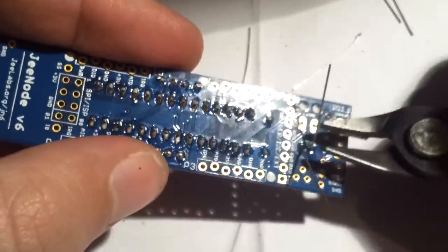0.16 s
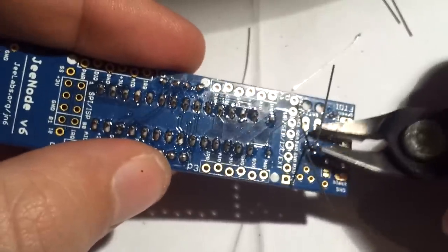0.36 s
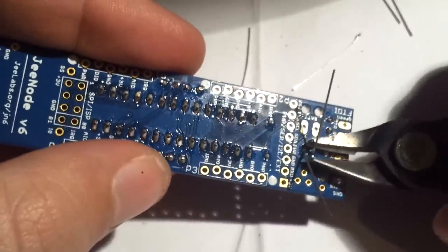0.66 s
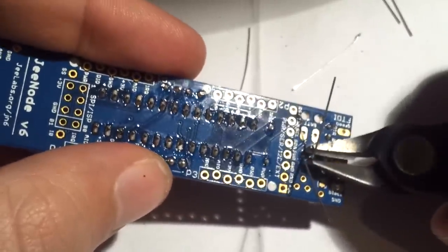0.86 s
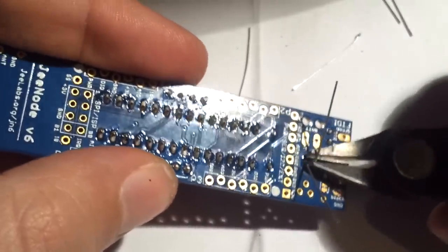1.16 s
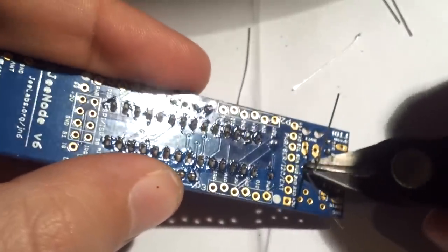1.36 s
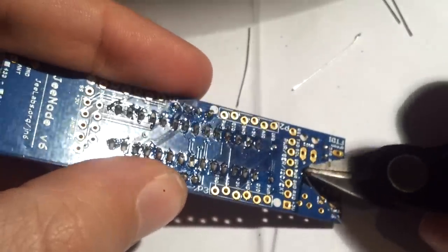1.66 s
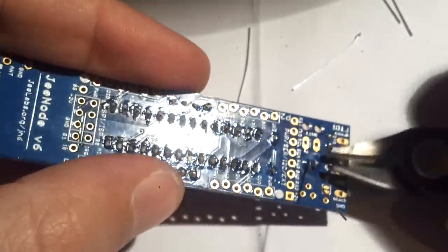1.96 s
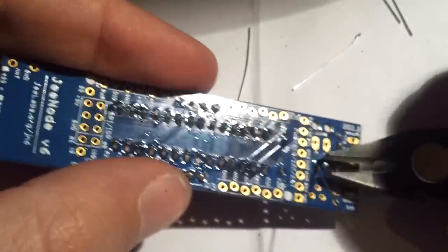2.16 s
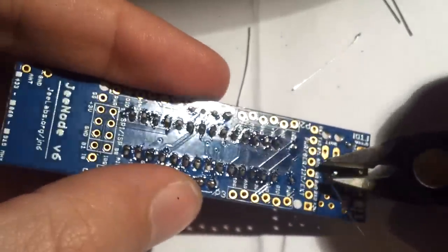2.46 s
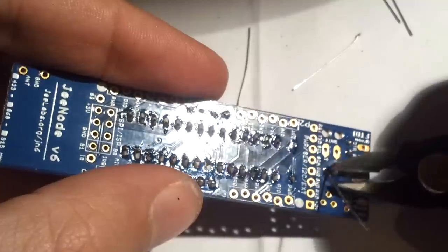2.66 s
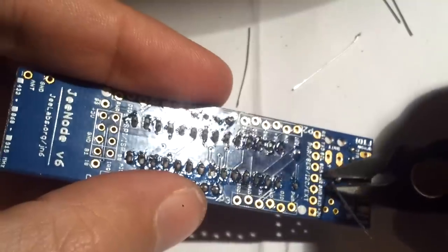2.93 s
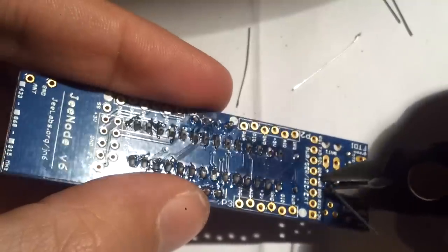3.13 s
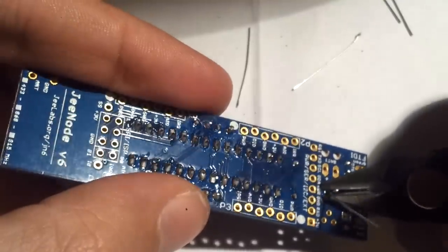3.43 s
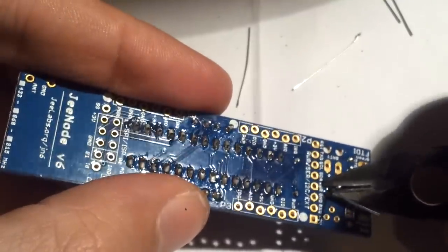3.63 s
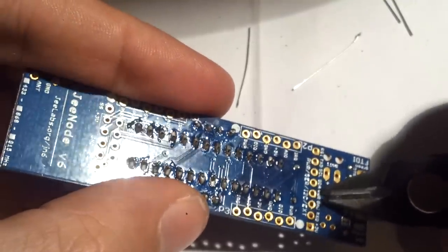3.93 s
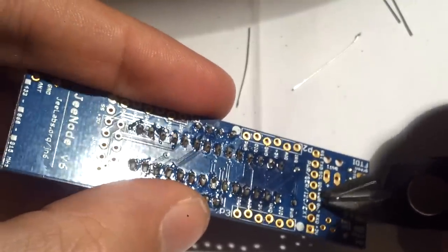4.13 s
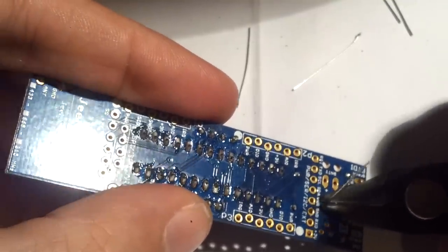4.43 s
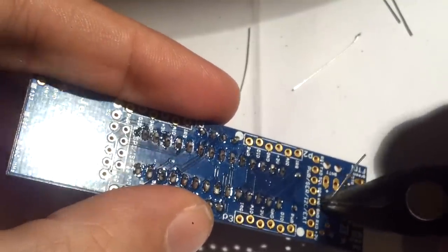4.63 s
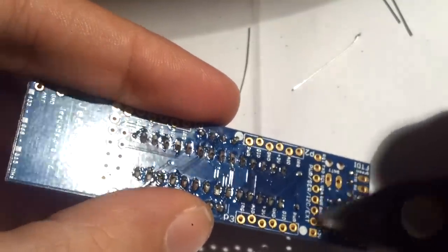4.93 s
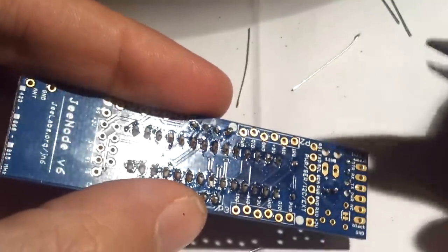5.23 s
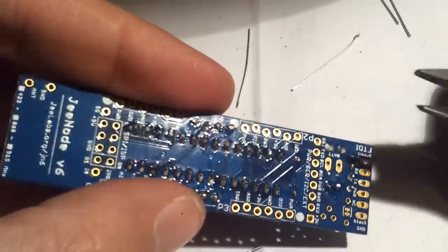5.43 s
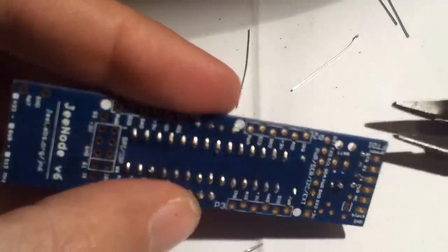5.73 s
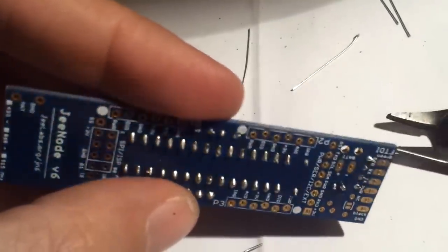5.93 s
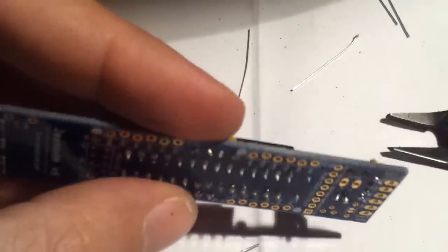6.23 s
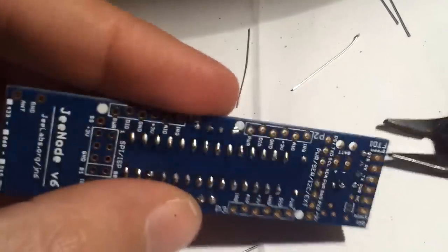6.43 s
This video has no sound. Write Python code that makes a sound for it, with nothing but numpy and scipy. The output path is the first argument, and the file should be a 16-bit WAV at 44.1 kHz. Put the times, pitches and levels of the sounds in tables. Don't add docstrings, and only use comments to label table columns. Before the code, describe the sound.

Close single-microphone sound of wire cutting on a small circuit board. A constant low fan hum with airy rush sits further off. Two very loud, dry, distorted metallic snips stand well apart; the first is followed by thin, bright bounces of the cut lead, the second by a short bright room tail. Then come faint metal ticks, one sharper, and a soft hollow tap.

```python
import sys
import numpy as np
from scipy import signal
from scipy.fft import rfft, irfft, next_fast_len
from scipy.io import wavfile
from scipy.ndimage import uniform_filter1d, map_coordinates

SR = 44100
rng = np.random.default_rng(int(sys.argv[2]) if len(sys.argv) > 2 else 0)


def voltage_ratio(level):
    return 10 ** (np.asarray(level, float) / 20)


def persist_wave(psi):
    counts = np.round(np.clip(psi, -1, 1) * 32767).astype(np.int16)
    wavfile.write(sys.argv[1], SR, np.atleast_2d(counts).T)


N = 290619

# start in seconds, blow in dB, jaw chatter in seconds, room answer in dB,
# pressure push in dB.
SNIPS = [
    (1.584, -1.5, 0.0049, -10, -30),
    (4.7898, -0.5, 0.0052, -4, -29),
]
# pitch in Hz, level in dB, t60 in seconds.
JAW_MODES = [
    [(2990, -10.5, 0.019), (4760, -10.5, 0.022), (5340, -14, 0.018), (5640, -3.5, 0.025),
     (6660, -11, 0.013), (7400, 1.5, 0.029), (8400, -12, 0.022), (10230, -5, 0.016), (11400, -14, 0.021),
     (12000, -30, 0.021)],
    [(3740, -17, 0.024), (4940, -2, 0.025), (5722, -4, 0.036), (6250, -11, 0.021), (7700, 0, 0.029),
     (8300, -19, 0.085), (9700, -7, 0.072), (10200, -18, 0.035), (10270, -8, 0.024), (11540, -10, 0.04)],
]
# frequency in Hz, level in dB.
CRACK_COLOURS = [
    [(590, -54), (1000, -27), (1420, -12), (2330, -27), (2890, -8), (4240, -27), (4600, -12.5), (6670, -3),
     (9970, -2), (11800, -19), (15300, -49), (22000, -120)],
    [(590, -49), (1000, -22), (2280, -9.5), (2830, -13), (3820, -8.5), (4280, -12), (4790, -6.5),
     (6810, -2.5), (7550, 1), (11800, -19), (15300, -48), (22000, -120)],
]
# frequency in Hz, level in dB.
ANSWER_COLOURS = [
    [(2350, -40), (4000, -8), (5490, -8), (6280, -8), (6840, -1), (8120, -1), (11200, -10), (11800, -12),
     (15300, -45), (22000, -120)],
    [(1290, -37), (2200, -5), (2720, -19), (2930, -12), (3720, -4.5), (4560, -9.5), (7250, -3.5),
     (8760, -6), (11800, -12.5), (15300, -41), (22000, -120)],
]
# frequency in Hz, t60 in seconds.
ROOM_DECAY = [(2000, .2), (5000, 0.27), (8000, 0.33), (12000, 0.25)]
ECHO_LUMPS_DB, ECHO_LUMPS_PER_S = 2, 300

# start in seconds, peak in dB, pitch in Hz, t60 in seconds.
BOUNCES = [
    (1.8503, -15, 7540, 0.0056),
    (1.8526, -26, 6560, .004),
    (1.866, -26, 6300, 0.013),
    (1.9599, -12, 7300, 0.0056),
    (1.9708, -32, 9500, 0.0067),
    (1.995, -22, 8000, 0.0039),
]
# start in seconds, peak in dB, pitch in Hz,
# t60 in seconds.
BRUSHES = [(.3955, -31.5, 9700, 0.011), (1.692, -22, 7900, 0.049), (5.535, -16, 9070, 0.0065),
           (5.539, -26, 8000, .006), (5.583, -31, 9300, .005), (5.6235, -27, 5000, .015),
           (5.661, -31, 9200, .03), (5.6616, -30, 5300, .012), (5.667, -25.5, 7100, 0.022),
           (5.88, -39, 10400, .04), (5.9055, -28, 9250, .008), (5.9930, -8.5, 5700, 0.0051),
           (5.9947, -23.5, 6900, 0.032), (6.004, -27, 7500, .01), (6.019, -23, 6900, .005),
           (6.485, -30.5, 8400, 0.014)]
BOUNCE_OVERTONE_DB, BRUSH_OVERTONE_DB = -5.5, -5
OVERTONE_PITCH, OVERTONE_DECAY = 1.53, 1.74
NOISY_AT_PIVOT, NOISY_PER_OCTAVE, PIVOT_HZ = 0.36, 0.33, 7500
RISE_SHARE = 0.022

# start in seconds, level in dB.
KNOCK = (6.4856, -18)
# pitch in Hz, level in dB, t60 in seconds.
BOARD_MODES = [(202, 1, .06), (327, 1, 0.06), (517, -11, 0.045), (910, -0.5, 0.047), (1310, -5, 0.033),
               (1710, -6, .02)]

SHAFT_HZ = 43.282
# multiple of the shaft speed, rms in dB.
FAN_ORDERS = [(1, -65.9), (4, -51.8), (5, -38.9), (10, -41.1), (17, -40.8), (20, -52.4), (25, -55.0),
              (30, -56.0), (35, -56.8), (40, -60.0), (45, -61.9)]
# frequency in Hz, rms in dB.
MAINS = [(100.0, -57.8), (300.0, -40.9), (2354.12, -65.7), (2690.38, -59.0)]
# frequency in Hz, density in dB per Hz.
RUSH_COLOUR = [(20, -84), (45, -75.5), (100, -66.5), (125, -61.5), (250, -58), (300, -57.5), (405, -63),
               (460, -58), (530, -57), (590, -63), (680, -65), (730, -59), (850, -61.5), (930, -70),
               (1000, -69), (1120, -61), (1220, -65.5), (1500, -64), (1700, -66), (2020, -73), (2400, -68.5),
             (2800, -67), (3350, -73), (4100, -75.5), (5100, -74), (6300, -78.5), (8000, -81.5),
               (9000, -87.5), (9400, -89), (9800, -90.3), (10400, -91.8), (11000, -93.3), (12000, -96)]
RUSH_DB = -1.28

TOP_HZ, BLOCK_S = 11900, 128 / SR
# frequency in Hz, level of one bin in dB.
AUDIBLE = [(7500, -100), (8400, -83), (9000, -76), (9600, -75), (12000, -75)]
# lead in seconds, number of gaps, silent above in Hz,
# rise of that edge per gap as a ratio.
TREBLE_GAPS = [
    (.0115, 2, 1800, 1.0),
    (.0169, 4, 2200, 1.55),
]


def unit(x):
    return x / np.sqrt(np.mean(x ** 2) + 1e-20)


def along(points, hz):
    f, v = np.transpose(points)
    return np.interp(np.log(hz + 1), np.log(f + 1), v)


def filtered(x, response):
    m = next_fast_len(len(x) + 8192)
    return irfft(rfft(x, m) * response(np.fft.rfftfreq(m, 1 / SR)), m)[:len(x)]


def wobble(rate):
    knots = rng.standard_normal(int(N * rate / SR) + 4)
    return map_coordinates(knots, [np.arange(N) * rate / SR])


def ring(modes, t):
    return sum(voltage_ratio(db - 60 * t / t60) * np.sin(2 * np.pi * hz * t) for hz, db, t60 in modes)


def add(track, s, sound):
    part = track[round(s * SR):][:len(sound)]
    part += sound[:len(part)]


def room(x):
    hz, t, z = signal.stft(rng.standard_normal(SR // 3), SR, nperseg=256)
    decay = voltage_ratio(-60 * t / along(ROOM_DECAY, hz)[:, None])
    tail = signal.istft(z * decay, SR, nperseg=256)[1]
    late = np.pad(x, (round(0.0039 * SR), 0))
    return signal.fftconvolve(late, tail / np.linalg.norm(tail))[:len(x)]


def snips():
    out, t = np.zeros(N), np.arange(SR // 3) / SR
    for snip, modes, bite, echo in zip(SNIPS, JAW_MODES, CRACK_COLOURS, ANSWER_COLOURS):
        s, db, chatter, room_db, push_db = snip
        shape = np.exp(-(t / chatter) ** 4) + 0.1 * voltage_ratio(-60 * t / 0.019)
        hiss = filtered(rng.standard_normal(len(t)), lambda hz: voltage_ratio(along(bite, hz)))
        crack = shape * unit(hiss / np.sqrt(np.abs(signal.hilbert(hiss))))
        blow = voltage_ratio(-5.5) * crack + voltage_ratio(-8) * ring(modes, t)
        blow = blow * (1 - np.exp(-t / 0.00023))
        answer = filtered(room(1. * (t == 0)), lambda hz: voltage_ratio(along(echo, hz)))
        answer = answer * voltage_ratio(ECHO_LUMPS_DB * wobble(ECHO_LUMPS_PER_S)[:len(t)])
        push = np.exp(-t / .05) * np.cos(2 * np.pi * 6 * t) * (1 - np.exp(-t / .003))
        add(out, s, voltage_ratio(db) * blow + voltage_ratio(db + room_db + 23.5) * answer + voltage_ratio(push_db) * push)
    return out


def overtones(contacts, over_db):
    return [(s, db + over_db, hz * OVERTONE_PITCH, t60 * OVERTONE_DECAY) for s, db, hz, t60 in contacts]


def ticks():
    out, t = np.zeros(N), np.arange(SR // 4) / SR
    upper = overtones(BOUNCES, BOUNCE_OVERTONE_DB) + overtones(BRUSHES, BRUSH_OVERTONE_DB)
    for s, db, hz, t60 in BOUNCES + BRUSHES + upper:
        near = lambda f: np.exp(-(np.log((f + 1) / hz) / 0.27) ** 2)
        puff = unit(filtered(rng.standard_normal(len(t)), near)) * voltage_ratio(-60 * t / t60)
        share = np.clip(NOISY_AT_PIVOT + NOISY_PER_OCTAVE * np.log2(hz / PIVOT_HZ), 0, 1)
        tick = (1 - share) * ring([(hz, 0, t60)], t) + 0.83 * share * puff
        tick = tick * (1 - np.exp(-t / (RISE_SHARE * t60)))
        add(out, s, voltage_ratio(db) * (tick + voltage_ratio(-12.5) * room(puff)))
    return out


def knock():
    out, t = np.zeros(N), np.arange(SR // 5) / SR
    s, db = KNOCK
    add(out, s, voltage_ratio(db) * ring(BOARD_MODES, t) * (1 - np.exp(-t / 0.0018)))
    return out


def tone(cycles, db):
    level = voltage_ratio(db + 0.45 * wobble(2.73)) * np.sqrt(2)
    return level * np.sin(2 * np.pi * (cycles + rng.random()))


def fan():
    t = np.arange(N) / SR
    turns = SHAFT_HZ * t + 0.0048 * wobble(0.98)
    blades = sum(tone(round(k) * turns, db) for k, db in FAN_ORDERS)
    mains = sum(tone(hz * t, db) for hz, db in MAINS)
    colour = RUSH_COLOUR
    rush = filtered(rng.standard_normal(N), lambda hz: voltage_ratio(along(colour, hz)) * np.sqrt(SR / 2))
    return blades + mains + rush * voltage_ratio(RUSH_DB + 0.21 * wobble(5.6))


def scene():
    return np.tile(snips() + ticks() + knock() + fan(), (2, 1))


def thinned(x):
    window, lead = signal.windows.kaiser_bessel_derived(2048, 4 * np.pi), 1024 - 123
    hz, _, z = signal.stft(np.pad(x, (lead, 0)), SR, window, nperseg=2048)
    floor_db = along(AUDIBLE, hz) - 100 * (hz < AUDIBLE[0][0])
    z = z * (np.abs(z) > voltage_ratio(floor_db)[:, None])
    return signal.istft(z, SR, window, nperseg=2048)[1][lead:lead + N]


def treble_gaps(x):
    t, lost = np.arange(N) / SR, np.zeros(N)
    for (s, *_), (lead, gaps, edge_hz, rise) in zip(SNIPS, TREBLE_GAPS):
        for k in range(gaps):
            gap = uniform_filter1d(1. * ((t - s + lead) // BLOCK_S == k), size=40)
            lost += gap * filtered(x, lambda hz: 1 - 1 / (1 + (hz / (edge_hz * rise ** k)) ** 24))
    return lost


def low_pass(x):
    return signal.sosfilt(signal.butter(12, 11910, fs=SR, output="sos"), x)


def record(dry):
    x = dry[0] / (1 + np.abs(dry[0] / 1.08) ** 6) ** (1 / 6)
    x = thinned(filtered(x, lambda hz: 1 / (1 + (hz / TOP_HZ) ** 90)))
    return low_pass(np.tile(x - treble_gaps(x), (2, 1)))


dry = scene()
out = record(dry)
persist_wave(out)
```